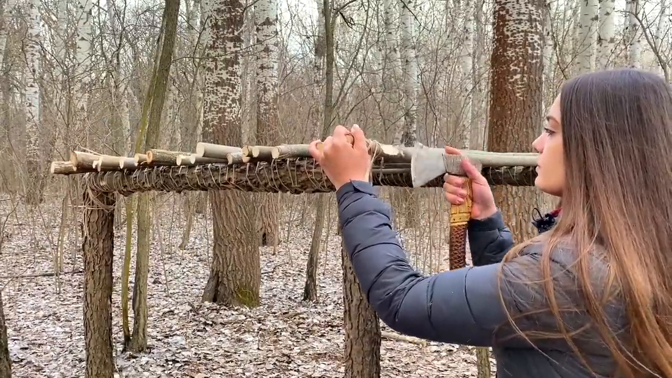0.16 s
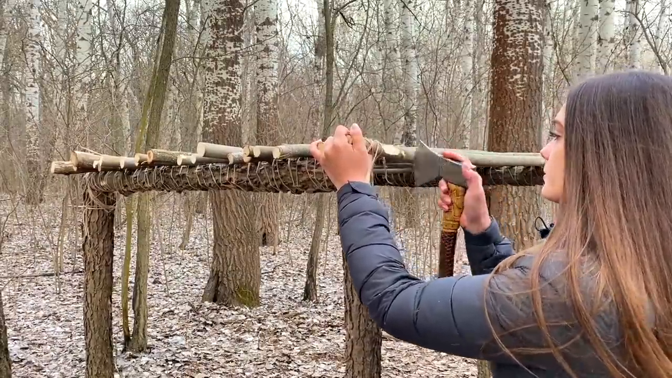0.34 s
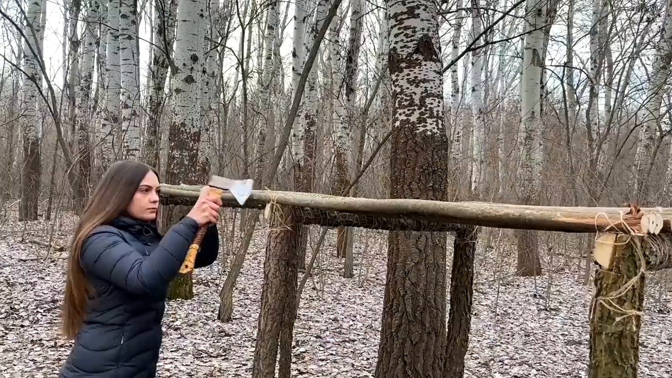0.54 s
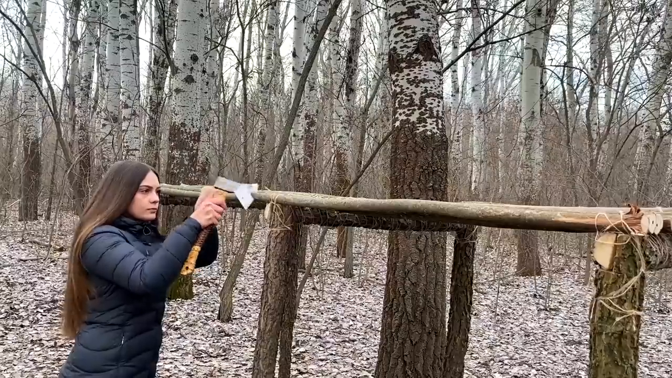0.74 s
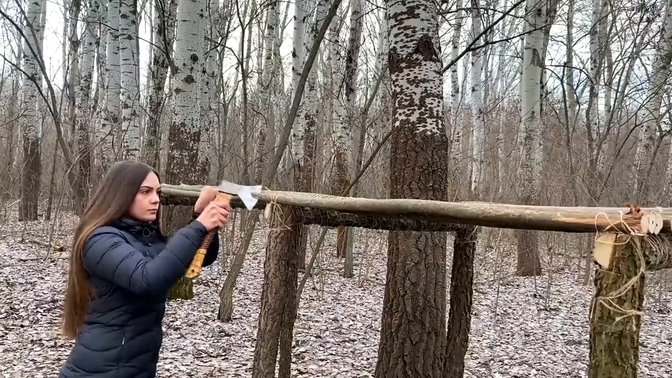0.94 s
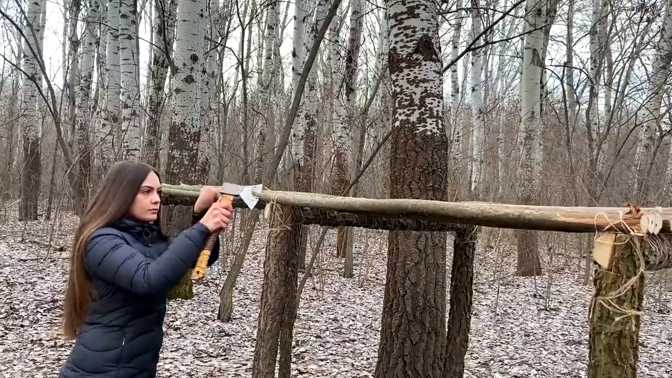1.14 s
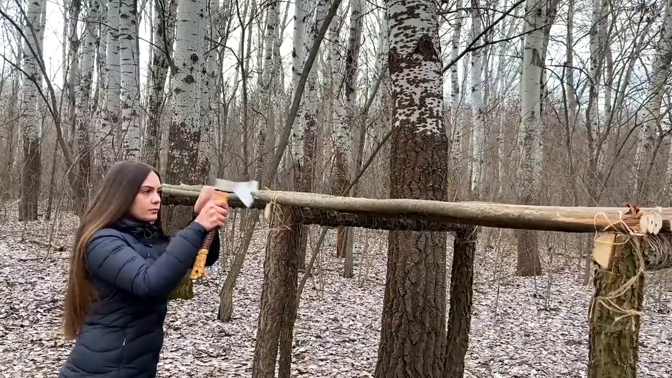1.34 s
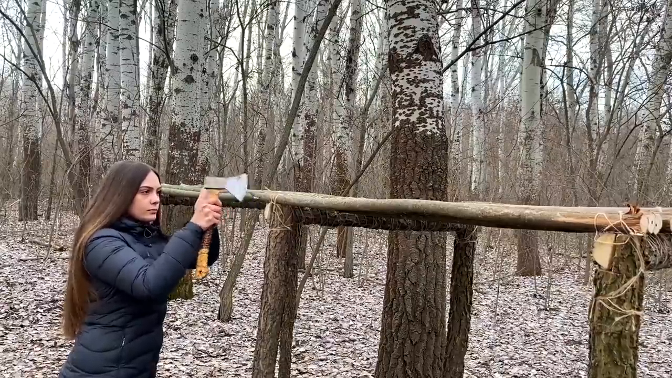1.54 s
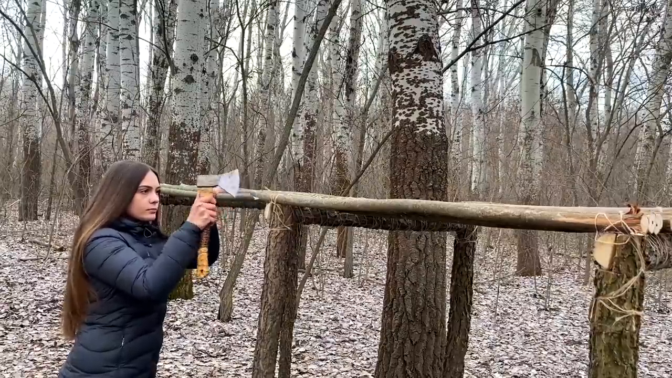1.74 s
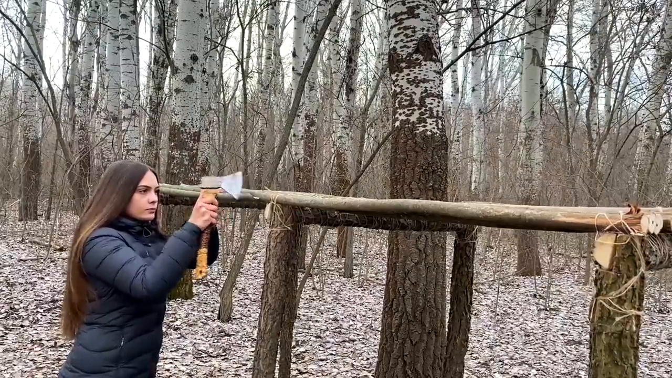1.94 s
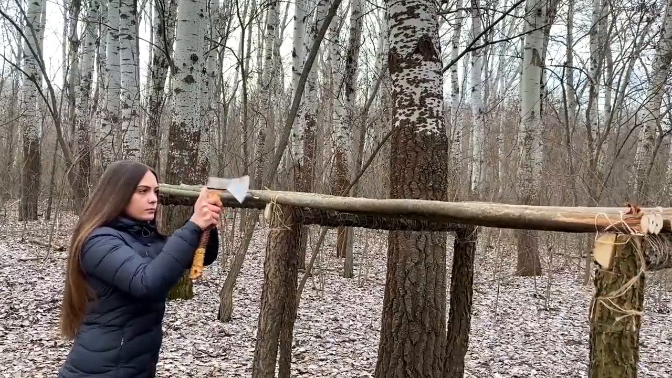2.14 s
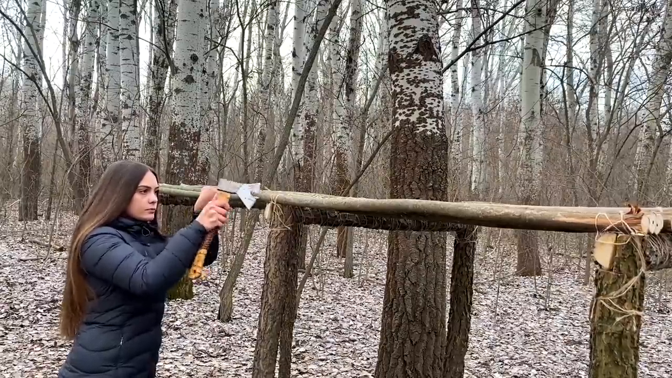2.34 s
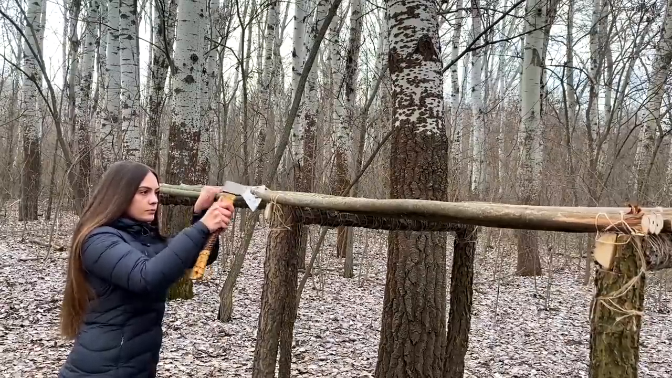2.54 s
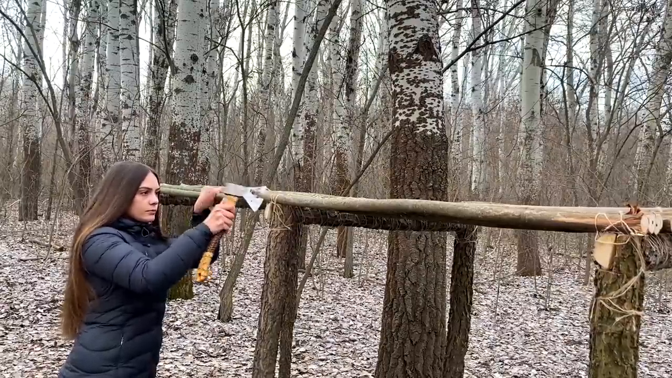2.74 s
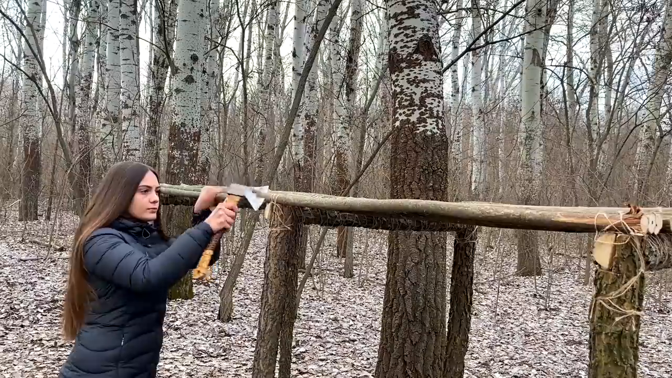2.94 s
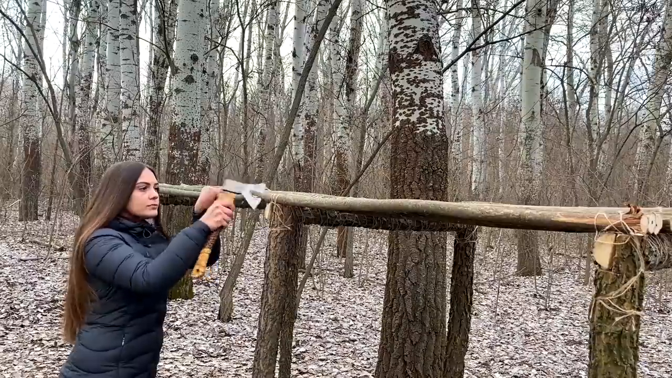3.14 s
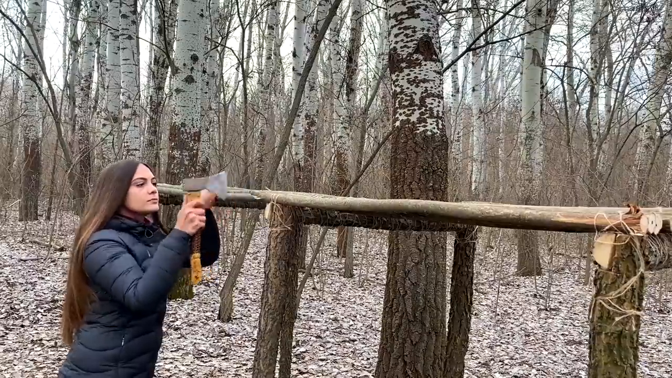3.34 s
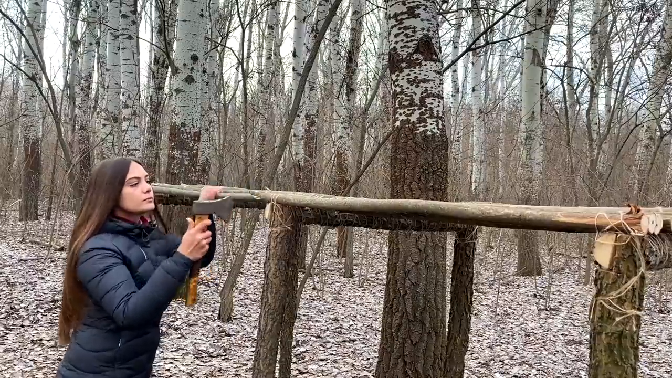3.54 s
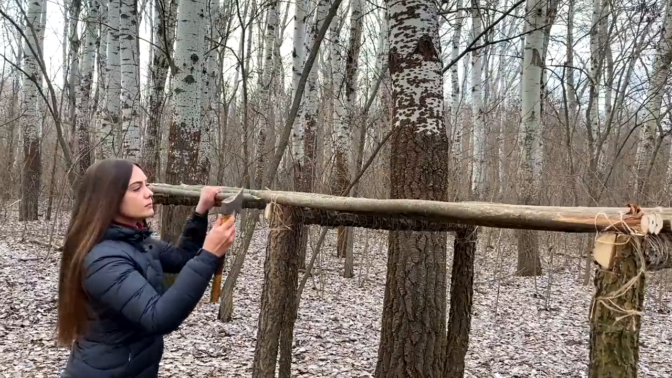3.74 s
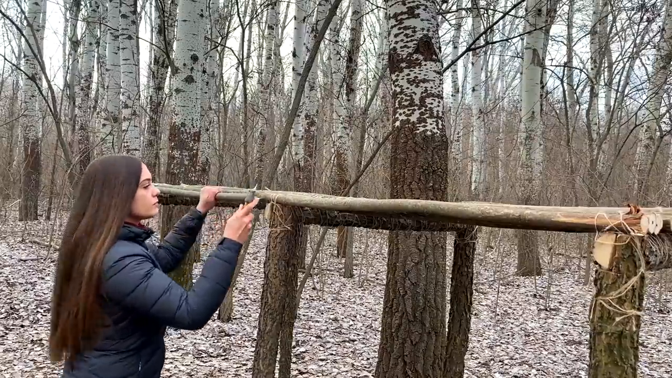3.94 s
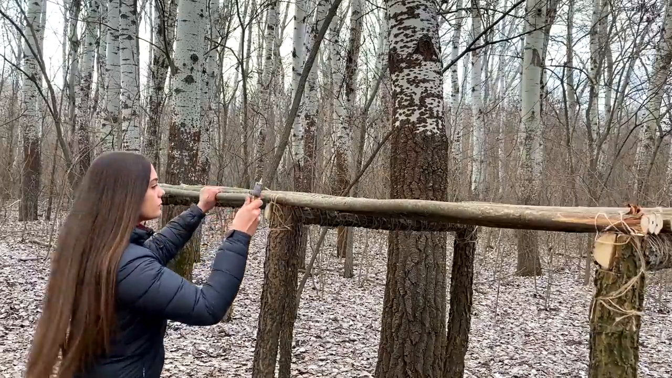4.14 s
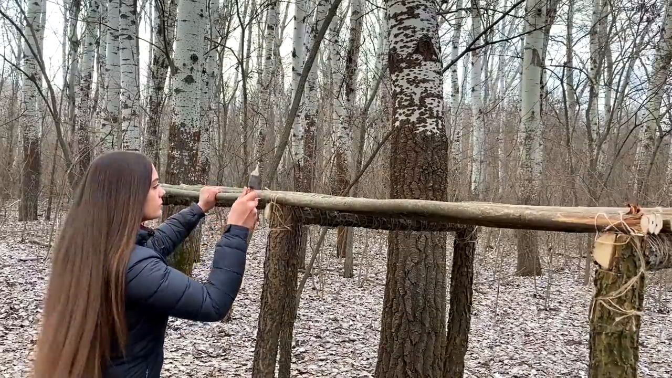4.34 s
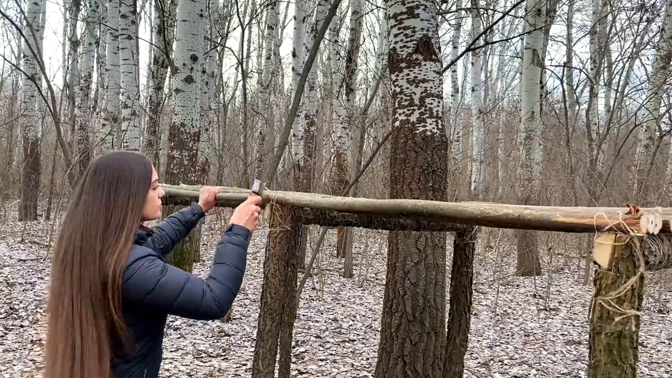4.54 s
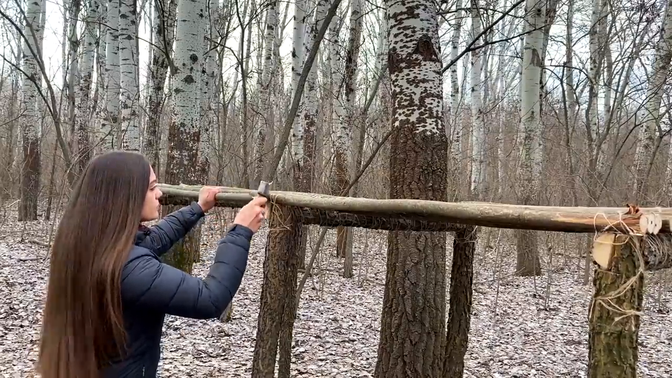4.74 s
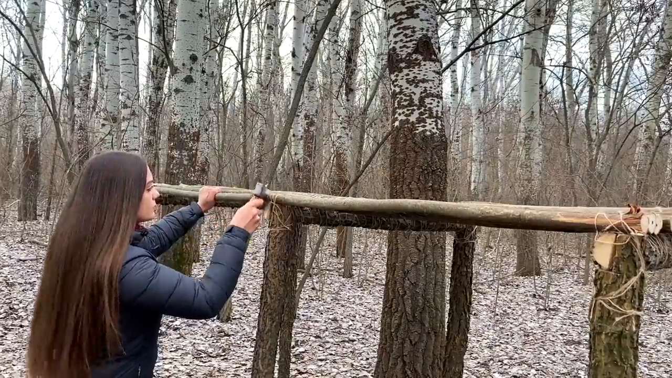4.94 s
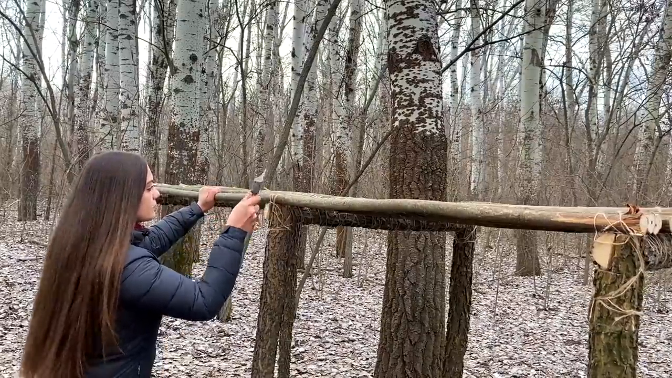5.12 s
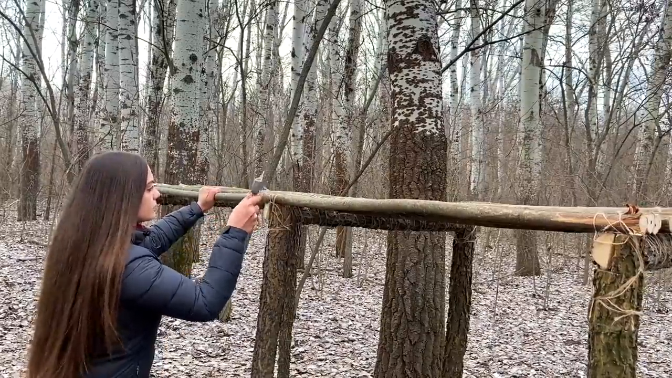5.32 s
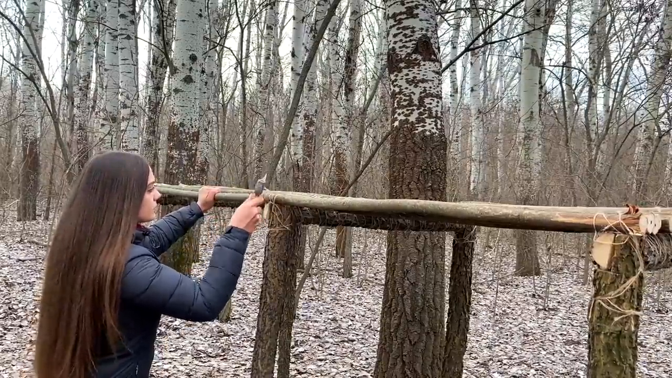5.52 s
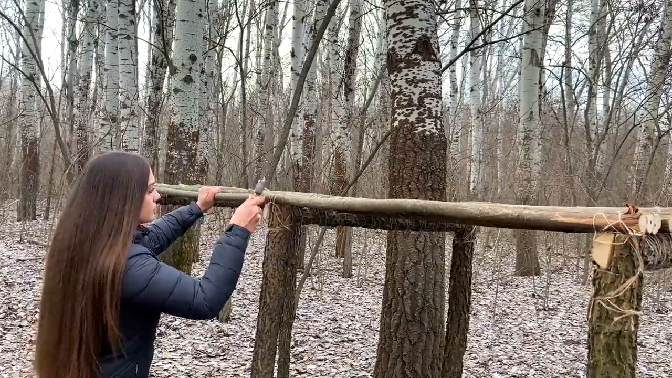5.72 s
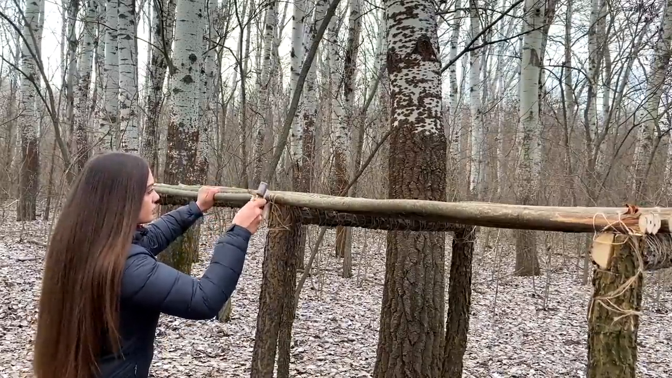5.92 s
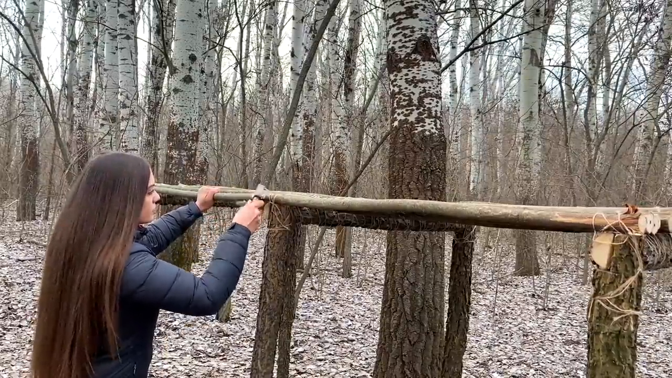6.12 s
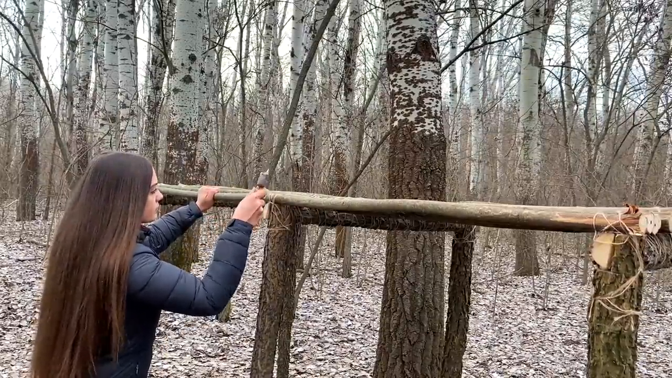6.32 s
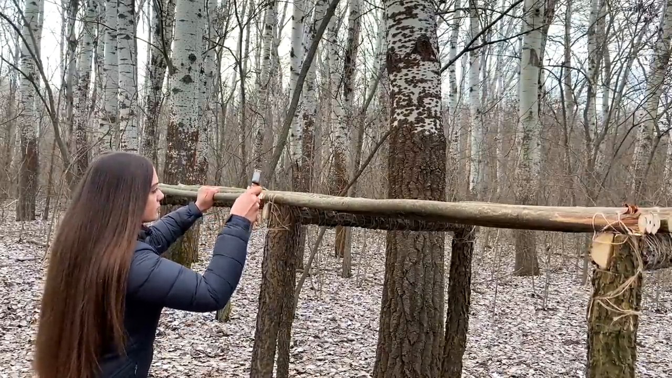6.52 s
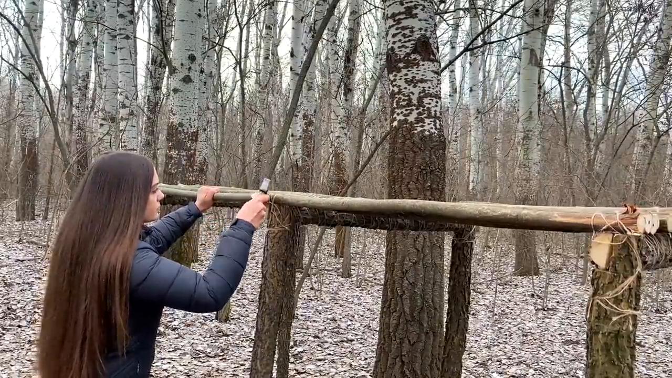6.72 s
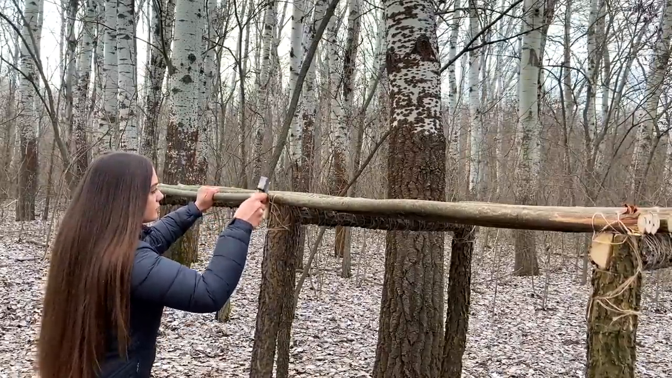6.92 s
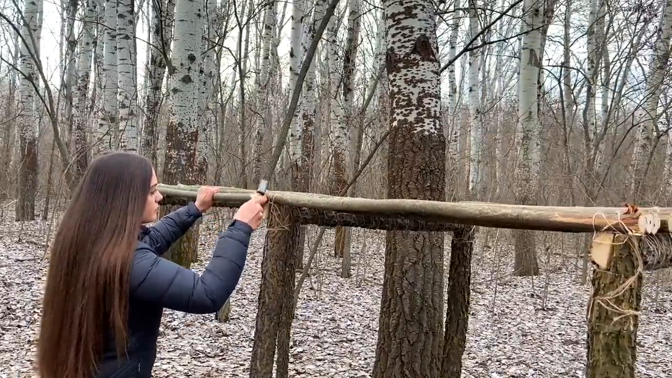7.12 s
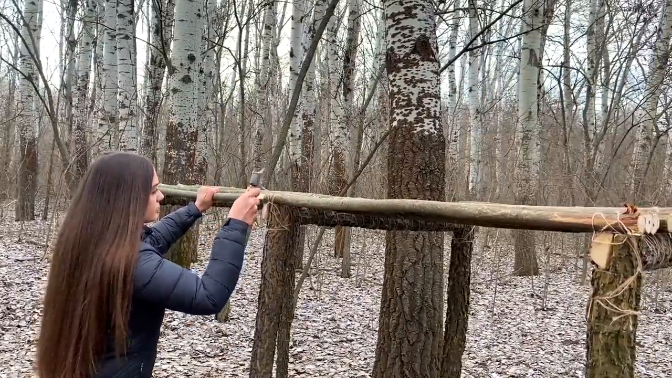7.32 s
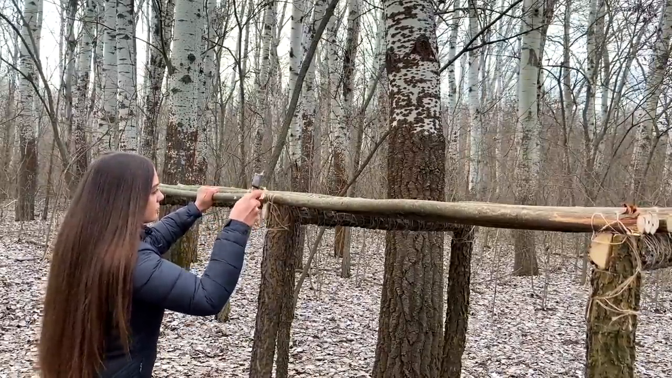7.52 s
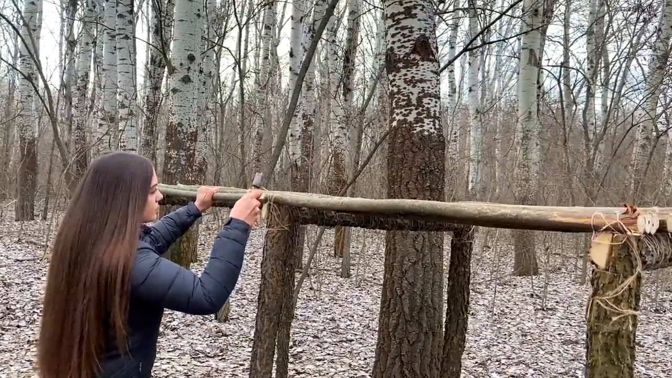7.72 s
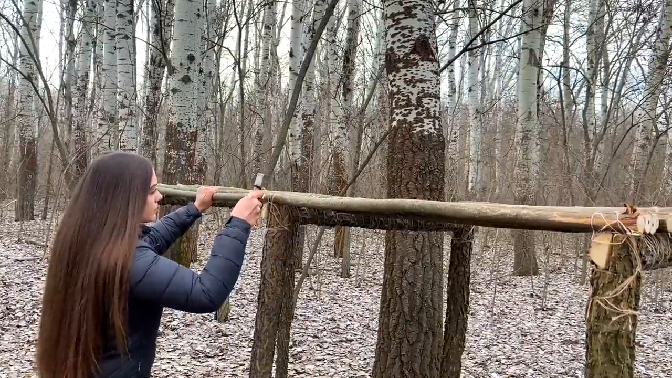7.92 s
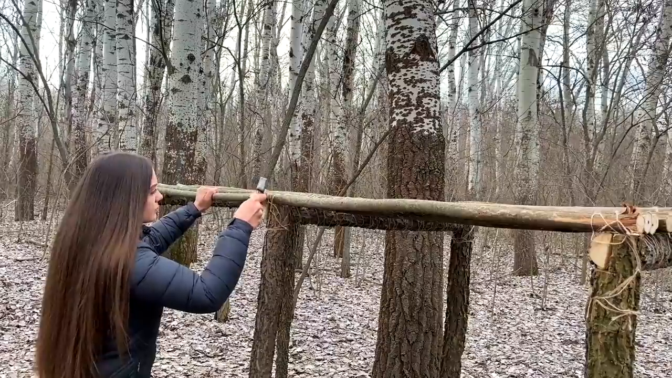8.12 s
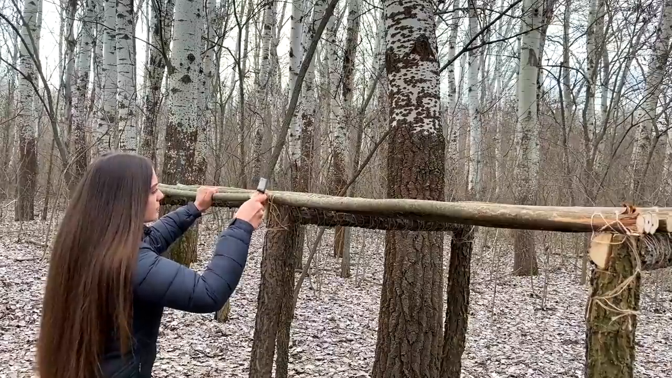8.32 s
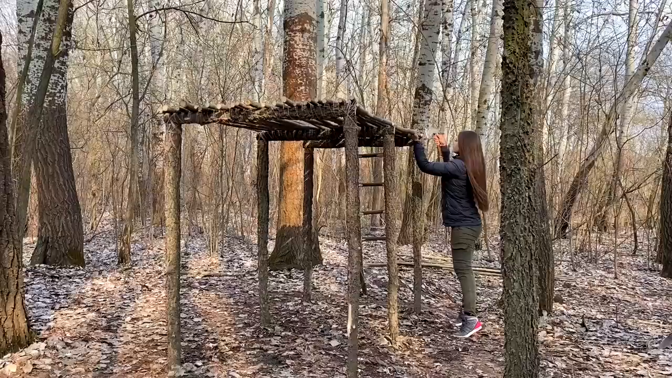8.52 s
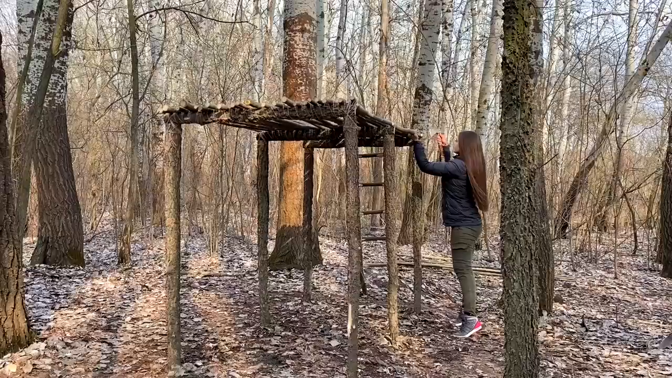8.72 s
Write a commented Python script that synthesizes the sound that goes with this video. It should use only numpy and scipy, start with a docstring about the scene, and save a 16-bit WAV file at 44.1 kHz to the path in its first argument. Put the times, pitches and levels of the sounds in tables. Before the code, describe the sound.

Steady hatchet blows knock on a wooden pole in the woods, heard from a few metres off with a brief echo from the trees. A first run builds in strength, then a jacket rustles and twigs tick in a short break. A softer, more clacking run follows, ending in two quiet, distant knocks. Thin bird calls and a faint deep rumble lie behind.

```python
"""A hatchet taps a wooden pole along a lashed frame in a bare forest, a few metres away.
Each blow knocks, crunches the bark, sets the pole and the steel head ringing and echoes off the trees.
A jacket rustles, twigs tick and birds call faintly over a distant rumble and a deep drone.
The whole sound dips briefly twice; the last two blows are further off, quieter and with more echo."""
import sys
import numpy as np
from scipy import signal
from scipy.io import wavfile
from scipy.ndimage import uniform_filter1d

SR = 44100
rng = np.random.default_rng(int(sys.argv[2]) if len(sys.argv) > 2 else 0)


def int16_out(signal):
    """Quantize to a 16-bit WAV file."""
    q = np.round(np.clip(np.atleast_2d(signal).T, -1, 1) * 32767)
    wavfile.write(sys.argv[1], SR, q.astype(np.int16))


N = 391166
FIRST_RUN_S = 3.3  # the first run of blows is over by this time
OPPOSITE = np.array([[1], [-1]])  # plus on the left, minus on the right


def undb(db):
    return 10 ** (np.asarray(db) / 20)


def unit(x):
    return x / np.sqrt(np.mean(x ** 2))


def on_log(hz, points, values):
    return np.interp(np.log(hz), np.log(points), values)


def band(x, hz, octaves):
    edges = np.clip(hz * 2. ** (np.array([-.5, .5]) * octaves), 10, SR * .49)
    return signal.sosfilt(signal.butter(2, edges, "bandpass", fs=SR, output="sos"), x)


def walk(rate):
    """A smooth random drift, roughly 1 either way, with `rate` new values a second."""
    k = int(SR / rate)
    steps = np.repeat(rng.standard_normal(N // k + 1), k)
    return 1.3 * uniform_filter1d(uniform_filter1d(steps, k), k)[:N]


def flutter(shape, samples):
    """A fast random wobble: noise smoothed over a few samples."""
    return unit(uniform_filter1d(rng.standard_normal(shape), size=samples))


def add(out, x, s):
    i = min(int(s * SR), N)
    out[..., i:i + x.shape[-1]] += x[..., :N - i]


def fade(t, t60):
    """Starts at t = 0 and falls 60 dB in t60 seconds, the fade time."""
    return (t >= 0) * np.exp(-np.log(1000) * np.maximum(t, 0) / t60)


def wash(spectrum, swell_db, flicker_db, alike_hz):
    """Noise bands that swell together and flicker alone; left and right grow alike below alike_hz."""
    hz, db = np.transpose(spectrum)
    out, swell = 0, walk(1.5)
    for centre in hz[0] * 2 ** np.arange(0, np.log2(hz[-1] / hz[0]), .5):
        mid, side = band(rng.standard_normal((2, N)), centre, 0.51)
        gain = undb(on_log(centre, hz, db) + swell_db * swell + flicker_db * walk(9))
        out = out + gain * (mid + min(.22 + centre / alike_hz, 1) * side * OPPOSITE)
    return unit(out)


def spells(table, rise_s, fade_s, floor_db):
    """Loudness of sounds that swell, hold and die away over a steady floor."""
    t, gain = np.arange(N) / SR, undb(floor_db)
    for s, hold, db in table:
        rise = np.clip((t - s) / rise_s + 1, 0, 1)
        gain = gain + undb(db) * rise * fade(np.maximum(t - s - hold, 0), fade_s)
    return gain


# Each row: pitch in Hz, relative strength of the noise there in dB.
RUMBLE_SPECTRUM = [(59, -51), (100, -11.5), (207, -12.5), (398, -14.5), (858, -16.5), (1490, -35.5),
                   (3000, -37.5), (3900, -83.5), (6600, -120)]


def rumble():
    """A distant, low rush that swells gently."""
    return undb(-60.5) * wash(RUMBLE_SPECTRUM, swell_db=0.63, flicker_db=1.07, alike_hz=1334)


# Each row: time in seconds, level of the drone in dB.
DRONE_LEVELS = [(0, -60.5), (.4, -58), (3, -62), (3.9, -62.5), (4.6, -59), (6.1, -57.5), (7, -58.5),
                (8.3, -56), (8.6, -60)]


def drone():
    """A deep wavering drone near 62 Hz, almost the same left and right."""
    level_db = np.interp(np.arange(N) / SR, *np.transpose(DRONE_LEVELS))
    mid, side = band(band(rng.standard_normal((2, N)), 62, 0.94), 62, 1.5)
    return undb(level_db) * unit(undb(2.5 * walk(4)) * (mid + .3 * side * OPPOSITE))


# Each row: start in seconds, time held in seconds, level in dB.
CHATTER_SPELLS = [(0, 0.11, -68), (.5, 0.36, -67.5), (4.4, 0.53, -78.5)]


def far_chatter():
    """Far birds blur into a high, flickering band of noise."""
    gain = spells(CHATTER_SPELLS, rise_s=0.066, fade_s=0.93, floor_db=-79) * undb(3.2 * walk(30))
    return gain * unit(band(band(rng.standard_normal((2, N)), 3300, 1.0), 3400, 0.99))


# Each row: start in seconds, length in seconds, first pitch in Hz, last pitch in Hz, level in dB.
BIRD_CALLS = [(0.604, 0.26, 4980, 4880, -62.5), (1.938, 0.1, 4190, 4300, -71.5),
              (2.08, 0.2, 7500, 7420, -64), (2.663, 0.22, 7600, 7500, -69.5),
              (6.335, 0.035, 2300, 2800, -67.5), (6.36, 0.072, 2900, 2830, -65),
              (6.367, 0.07, 2600, 2650, -65), (6.503, 0.041, 2850, 2460, -67), (6.93, .15, 7430, 7270, -67),
              (7.068, 0.056, 2690, 3050, -62), (7.19, .14, 4200, 4150, -73),
              (7.199, 0.092, 2790, 2680, -68.5), (4.788, .09, 4300, 4400, -65),
              (8.6, 0.25, 7250, 7230, -72.5)]


def birds():
    """Thin gliding whistles that waver and fade, smeared by echoes from the trees."""
    out, t = np.zeros((2, N)), np.arange(SR // 10) / SR
    for s, length, first_hz, last_hz, db in BIRD_CALLS:
        progress = np.linspace(0, 1, int(length * SR))
        clear = min(length / .3, 1) ** 2  # long whistles are near and steady, short chirps far and blurred
        pitch_waver, level_waver = flutter((2, len(progress)), 200)
        hz = first_hz + (last_hz - first_hz) * progress + (110 - 70 * clear) * pitch_waver
        gain = undb(db - 7 * progress + 3 * level_waver) * np.sin(np.pi * progress ** .5) ** .6
        call = gain * np.sin(2 * np.pi * np.cumsum(hz) / SR)
        blur = rng.standard_normal((2, len(t))) * fade(t, .12)
        blur /= np.sqrt(np.sum(blur ** 2) / 2)
        add(out, clear * call, s)
        add(out, undb(-6 * clear) * signal.oaconvolve(call[None], blur, axes=1), s)
    return out


# Each row: start in seconds, level in dB, middle pitch in Hz.
SHORT_TICKS = [(0.183, -48.5, 6340), (0.2025, -52.5, 3490), (0.776, -63, 2200), (3.472, -44, 3680),
               (3.7497, -46, 2760), (3.766, -48.5, 900), (2.813, -56, 2900), (3.8887, -59, 2500),
               (8.103, -44.5, 2637)]


def ticks():
    """Twig clicks and one faint echo of a blow: each a short burst of noise with a soft tail."""
    out, t = np.zeros((2, N)), np.arange(SR // 10) / SR
    for s, db, hz in SHORT_TICKS:
        noise = unit(band(rng.standard_normal((2, len(t))), hz, 1.5))
        add(out, undb(db) * noise * (fade(t, .015) + undb(-12) * fade(t, .08)), s)
    return out


# The rustling hiss. Each row: pitch in Hz, relative strength in dB.
HISS_SPECTRUM = [(1500, -3), (3000, -6), (5000, -3.5), (7500, -2.5), (9000, -19), (11500, -8.5),
                 (13500, -21.5), (16500, -40)]
# Each row: start in seconds, time held in seconds, level in dB.
JACKET_RUSTLES = [(.13, 0.035, -59.5), (.22, .12, -71), (2.72, 0.11, -68), (3.27, 0.1, -72),
                  (3.48, 0.045, -62), (3.72, 0.13, -70), (4.02, 0.13, -73)]


def jacket():
    """Cloth rustles over a faint hiss; in the first run the sleeve joins in as the arm comes back."""
    sleeve = [(s + 0.051, .05, -71) for s, *_ in BLOWS_AND_RATTLE if s < FIRST_RUN_S]
    gain = spells(JACKET_RUSTLES + sleeve, rise_s=0.028, fade_s=0.092, floor_db=-76.5)
    return gain * undb(3 * walk(600)) * wash(HISS_SPECTRUM, swell_db=1.15, flicker_db=2.5, alike_hz=900)


# Each row: middle pitch of a band of echo in Hz, level in dB, fade time in seconds.
FOREST_BANDS = [(230.6, -7.5, 0.27), (536, -9, 0.22), (830, -28, 0.57), (1780, -25.5, 0.27),
                (3060, -28, 0.29), (6600, -33.5, 0.3)]


def forest_echo(attack):
    """Ground and trees scatter the start of a blow; the bass is alike left and right."""
    t, echo = np.arange(SR // 3) / SR, 0
    noise = rng.standard_normal((2, len(t)))
    for hz, db, t60 in FOREST_BANDS:
        mid, side = band(noise, hz, 1.1) * fade(t, t60) / np.sqrt(hz / 1000)
        echo = echo + undb(db) * (mid + min(hz / 1500, 1) * side * OPPOSITE)
    echo = echo * (1 - np.exp(-t / 0.016)) * undb(-5.0)
    return signal.oaconvolve(attack[None], echo, axes=1)


# Each row: pitch in Hz, how much louder the left is in dB, how far the left wave leads in radians.
LEFT_RIGHT = [(100, 4, .3), (300, 4.5, .3), (600, 2, .6), (1300, -5, -.3), (2400, 2, -.4), (2800, 3, .7),
              (3600, 4, -1.), (4600, 3, 2.8), (5200, 2, 1.3)]


def ring(hz, db, t60, t, spread_s):
    """Fading tones in stereo; low bending waves travel slowly, so low tones come late and swell slowly."""
    hz, db, t60 = hz[:, None], db[:, None], t60[:, None]
    age = np.maximum(t - spread_s * np.sqrt(1000 / hz), 0)
    gain = undb(db) * fade(age, t60) * (1 - np.exp(-age * hz * 1.2))
    pan_hz, pan_db, lead = np.transpose(LEFT_RIGHT)
    pan_db, lead = on_log(hz, pan_hz, pan_db), on_log(hz, pan_hz, lead)
    tones = [gain * undb(side * pan_db) * np.sin(2 * np.pi * hz * age + side * lead) for side in (.5, -.5)]
    return np.sum(tones, axis=1)


# Each row: pitch of one tone of the steel in Hz, level in dB, fade time in seconds.
HEAD_TONES = [(5200, -46, .45), (5275, -36, .16), (6600, -43, .04)]


def steel_head(t, force_db, later, shift, scatter):
    """The head gives a thin, fluttering ring; later it is gripped tighter and rings less."""
    hz, db, t60 = np.transpose(HEAD_TONES)
    db = db - .4 * force_db + 1.2 * scatter[:len(hz)]  # grows more slowly than the knock
    tones = ring(hz * (1 + .002 * shift[:len(hz)]), db, t60, t, spread_s=0.000041)
    return tones * undb(-4 * later + 4 * flutter(len(t), 250))


# Each row: pitch of one tone of the wood in Hz, level in dB in the first run, level in dB later on.
POLE_TONES = [(124.2, -10, -9), (166.6, -6.5, -7.5), (286.8, 0, -2), (417.7, -1, -1.5), (484.5, 4.5, 0.5),
              (697, -9.5, -3), (796.7, 0.5, -1.5), (995.4, -1, 0.5), (1240, 4, 2.5), (1387.4, 0.5, 5.5),
              (1474.5, 7, 4), (1645, 1.5, 3.5), (1747, -5, -4.5), (1929, -9, 3.5), (2163, 4, 3),
              (2467, -1, 2.5), (2766, 2.5, 4), (2985, 5.5, 5.5), (3159, 5, 0), (3660, -1, 0),
              (3993, -10, -3.5)]


def wooden_pole(t, force_db, later, shift, scatter, clack_db, favoured_hz):
    """The pole rings briefly and roughly; the spot that is hit lifts the tones near one pitch."""
    hz, first_db, later_db = np.transpose(POLE_TONES)
    favour_db = 7.5 * np.exp(-(np.log2(hz / favoured_hz) / .09) ** 2)
    thud_db = -0.28 - 0.66 * force_db  # the low thud grows more slowly than the knock
    hollow_db = -1.3 * clack_db  # a clacking blow is hollow near 1 kHz
    colour_db = on_log(hz, [599.4, 987.4, 1666, 2260], [thud_db, hollow_db, 0, clack_db])
    db = (later_db if later else first_db) + favour_db + colour_db + 2 * scatter
    t60 = .048 * (1000 / hz) ** .55  # high tones die sooner
    tones = ring(hz * (1 + 0.0063 * shift), db, t60, t, spread_s=0.001113)
    # the pole rattles in its lashing and is struck again by many small jolts
    jolts = undb(-33) * band(rng.standard_normal(len(t)), 1500, 3.1) * fade(t - .003, 0.092)
    rattle = signal.oaconvolve(tones, jolts[None], axes=1)[:, :len(t)]
    return (tones + rattle) * undb(1.2 * flutter(len(t), 120))


def bark_crunch(t, force_db, clack_db):
    """Bark crunches in bright grains, more in a clacking blow; it grows more slowly than the knock."""
    grains = rng.standard_normal(len(t)) * undb(3.3 * flutter(len(t), 90))
    crunch = band(band(grains, 5730, 0.99), 4890, 1.0)
    crunch += undb(-12) * band(band(grains, 11150, 0.3), 11200, 0.44)
    crunch *= (1 - np.exp(-t / 0.0001)) * (fade(t, 0.06) + undb(-13.0) * fade(t, 0.206))
    crunch *= undb(-10.5 - 0.74 * force_db + clack_db)
    return np.array([crunch, -np.roll(crunch, 1)])  # left and right swing opposite ways


def knock(t, later, clack_db):
    """Steel meets wood: two or three waves that fall in pitch. A harder contact sounds higher."""
    u, hz = t - .001, 2100 * 2 ** (clack_db / 15.5)
    pulse = np.exp(-(u / 0.00058) ** 2) * np.sin(2 * np.pi * hz * u * (1 - 120 * u))
    return pulse * undb(2.5 + 0.26 * clack_db - 3.5 * later - 1.2 * OPPOSITE)


# The ground and two big trunks throw a blow back. Each row: delay in seconds, level change in dB.
SINGLE_ECHOES = [(.016, -16), (.053, -50), (0.103, -40)]
# Hatchet blows, and one brief rattle just after the blow at 6.046 s.
# Each row: start in seconds, level in dB, clack (lift of the high tones) in dB,
# relative level of the bounce in dB, favoured pitch in Hz.
BLOWS_AND_RATTLE = [(0.463, -34.5, -2, -6, 2160), (0.685, -29, -3.5, -23, 2340),
                    (0.91, -22.5, -5.5, -26, 1810), (1.132, -17, -5, -11, 1820),
                    (1.358, -17.5, -2, -9, 1820), (1.5843, -25.5, -1, -20, 2170),
                    (1.81, -21.5, -5.5, -3, 1840), (2.036, -19, -5, -4, 1740),
                    (2.269, -15, -1.5, -18, 1920), (2.4825, -13, -3, -0.5, 1860),
                    (2.704, -17.5, -4.5, -16, 1780), (2.924, -10.5, -3, -9, 1770),
                    (3.1505, -15, -2, -13, 1860), (4.487, -30, 3, -21, 2100), (4.718, -26, 5.5, -21, 1900),
                    (4.947, -28, 5.5, -29, 1445), (5.169, -25.5, 4.5, -16, 3030),
                    (5.386, -24, 3, -20, 2000), (5.6063, -18, 1.5, -20, 1567),
                    (5.8214, -25, 4.5, -18, 1670), (6.046, -33, 3.5, -18, 1460),
                    (6.067, -37.5, -0.5, -11, 2820), (6.679, -23, 0.5, -4.5, 1390),
                    (6.885, -26.5, 0.5, -16, 1930), (7.114, -30, 2, -6, 2380),
                    (7.369, -27.5, 0.5, -27, 2450), (7.585, -23, -2.5, -10.5, 1446),
                    (7.806, -21.5, -3, -28, 1046), (8.032, -23, 1.5, -5, 2420),
                    (8.261, -21, -1.5, -24, 1496), (8.572, -30.5, -3.5, -18, 1010),
                    (8.837, -31.5, -3, -17.5, 1220)]
USUAL_BLOW_DB, BOUNCE_S = -21, 0.0052
FAR_S, FAR_ECHO_DB = 8.5, 12  # blows after this time are further off and carry more echo


def hatchet():
    """Each blow knocks, crunches and rings; the head bounces once and the trees answer."""
    out, t = np.zeros((2, N)), np.arange(SR // 5) / SR
    for s, db, clack_db, bounce_db, favoured_hz in BLOWS_AND_RATTLE:
        force_db, later = db - USUAL_BLOW_DB, s > FIRST_RUN_S
        # the grip and the spot that is hit nudge each tone's pitch (shift) and level (scatter)
        shift, scatter = rng.standard_normal((2, len(POLE_TONES)))
        pole = wooden_pole(t, force_db, later, shift, scatter, clack_db, favoured_hz)
        head = steel_head(t, force_db, later, shift, scatter)
        contact = knock(t, later, clack_db) + bark_crunch(t, force_db, clack_db)
        blow = undb(-9.5) * pole + head + contact
        add(out, blow * undb(db), s)
        add(out, (contact + undb(-24.5) * pole) * undb(db + bounce_db), s + BOUNCE_S)
        for delay_s, echo_db in SINGLE_ECHOES:  # weaker after the first run
            add(out, blow * fade(t, 0.046) * undb(db + echo_db - 16 * later), s + delay_s)
        add(out, forest_echo(blow[0] * fade(t, 0.0094)) * undb(db + FAR_ECHO_DB * (s > FAR_S)), s)
    return out


# Everything dips briefly twice and ends quieter. Each row: time in seconds, level change in dB.
OVERALL_LEVEL = [(0, 0), (.41, 0), (.447, -16), (.458, 0), (8.42, 0), (8.472, -26), (8.495, -11),
                 (8.87, -13)]


def scene():
    """The hatchet and the sounds around it, under one shared volume curve."""
    mix = jacket() + far_chatter() + rumble() + hatchet() + ticks() + birds() + drone()
    return mix * undb(np.interp(np.arange(N) / SR, *np.transpose(OVERALL_LEVEL)))


def record(dry):
    """A phone softens the bass below 45 Hz and cuts the treble above 16 kHz."""
    dry = signal.sosfilt(signal.butter(2, 45, "highpass", fs=SR, output="sos"), dry)
    return signal.sosfilt(signal.ellip(8, .2, 70, 16000, fs=SR, output="sos"), dry)


dry = scene()
out = record(dry)
int16_out(out)
```